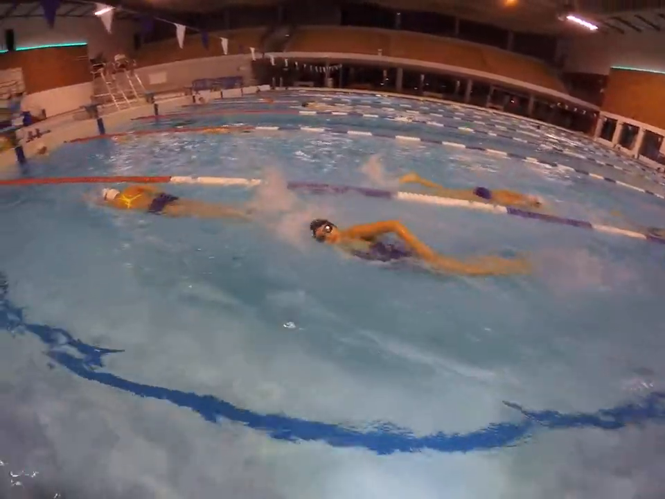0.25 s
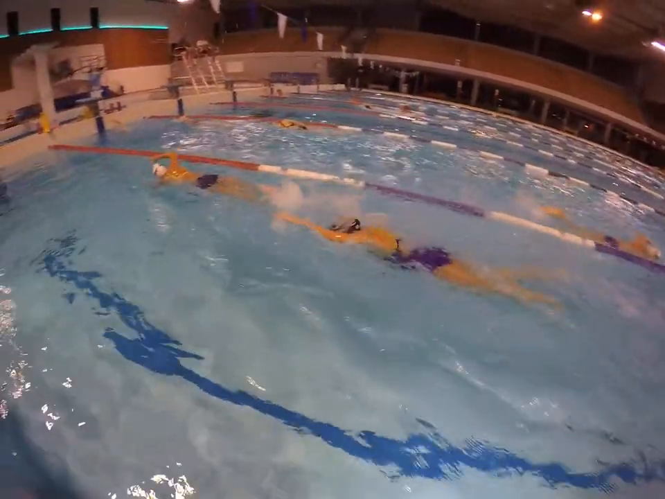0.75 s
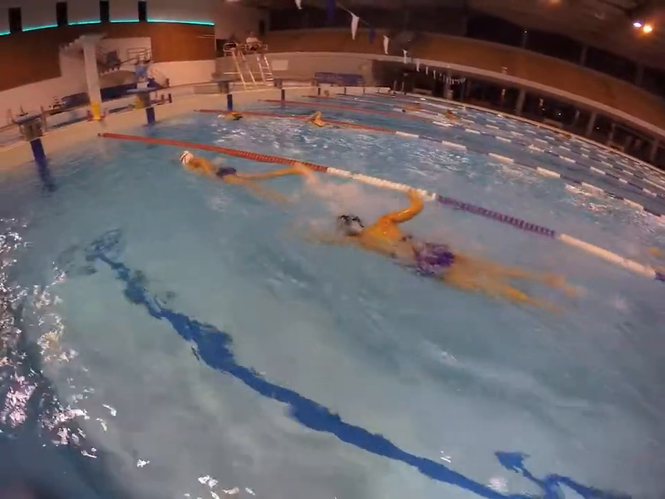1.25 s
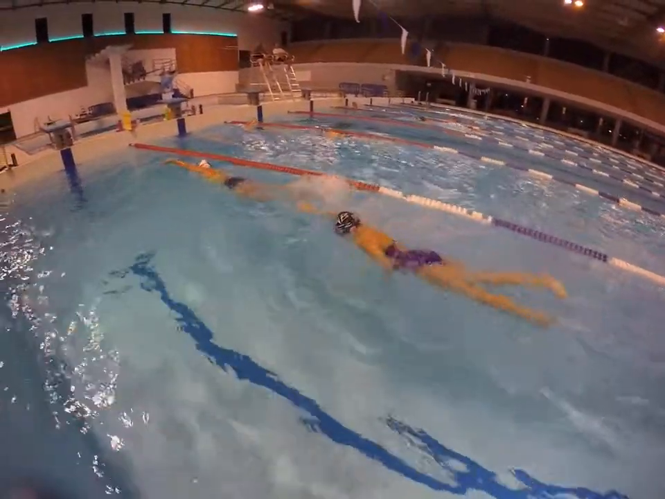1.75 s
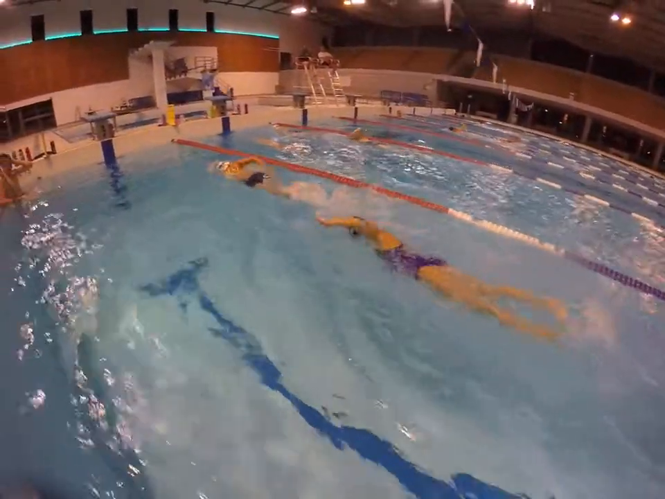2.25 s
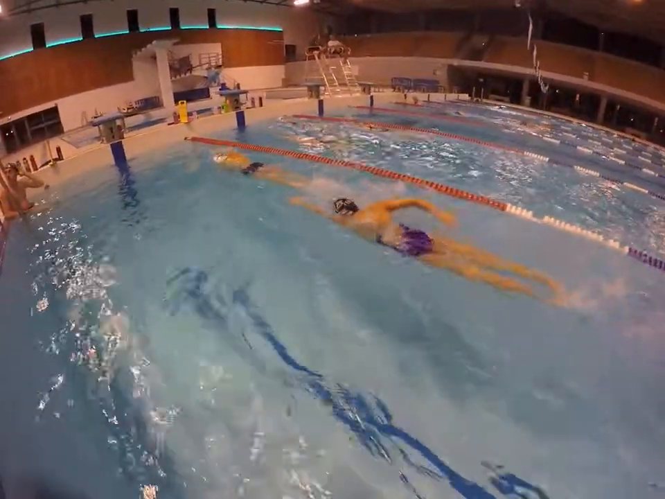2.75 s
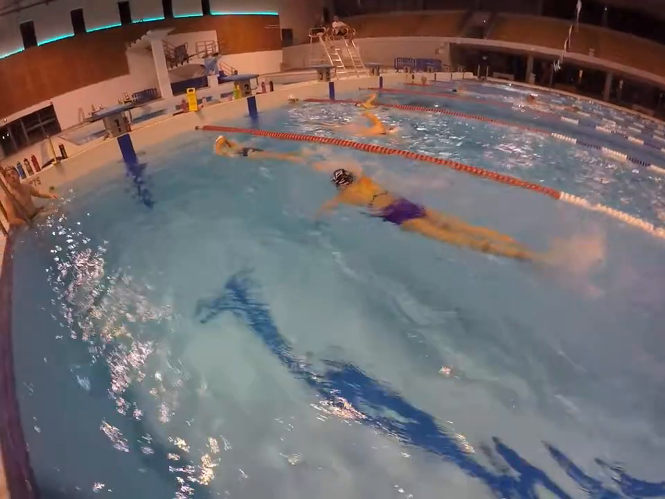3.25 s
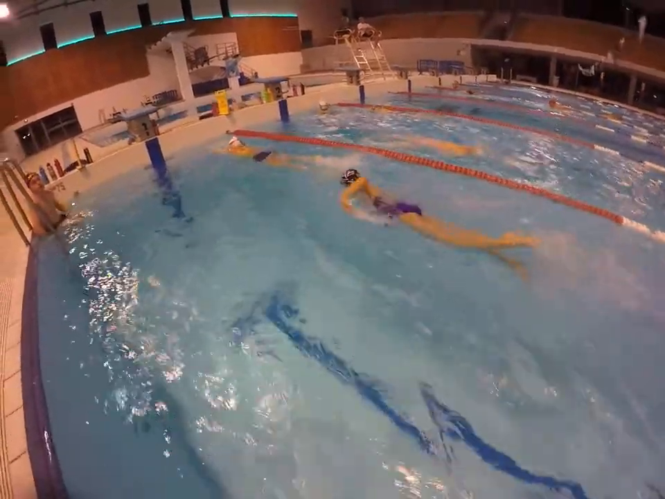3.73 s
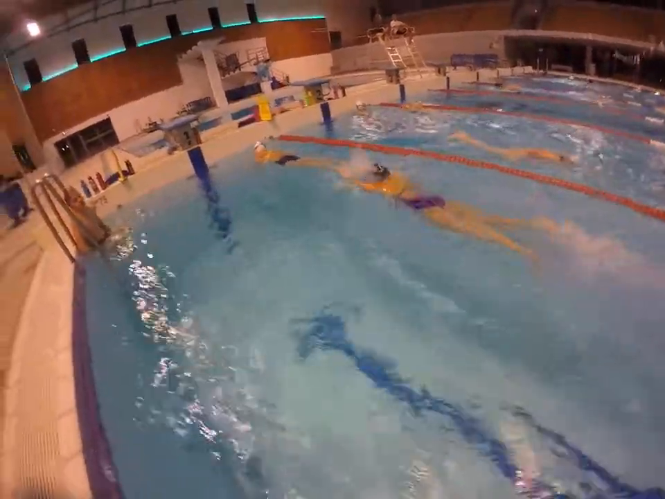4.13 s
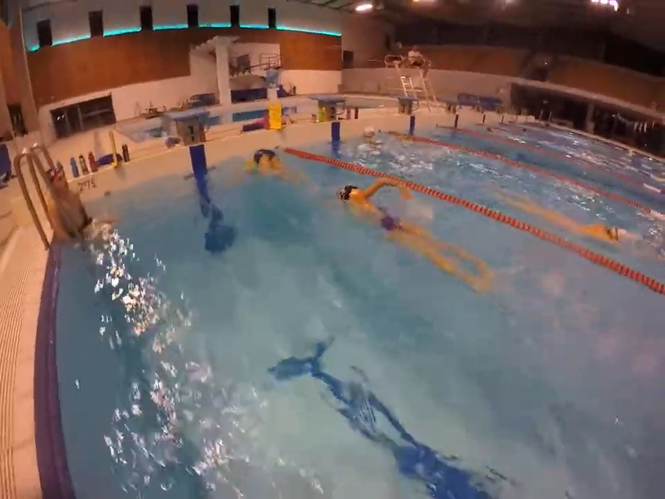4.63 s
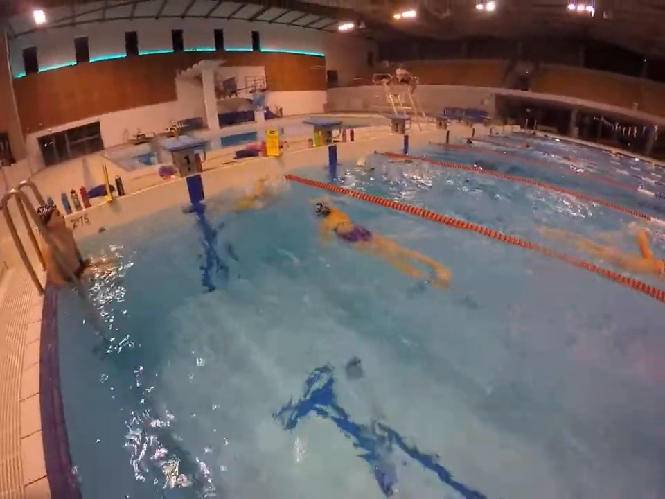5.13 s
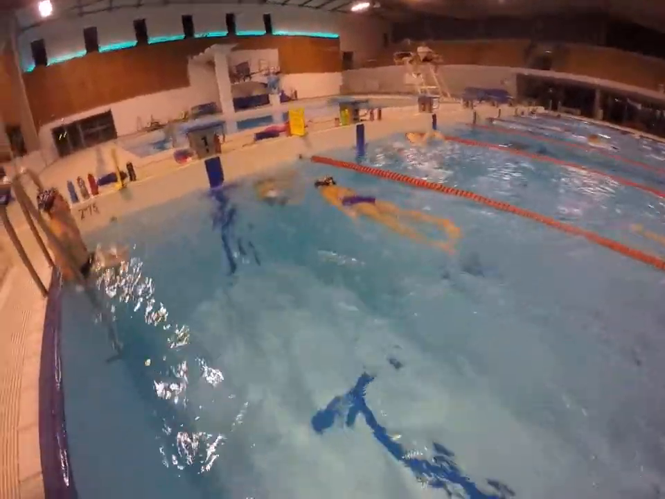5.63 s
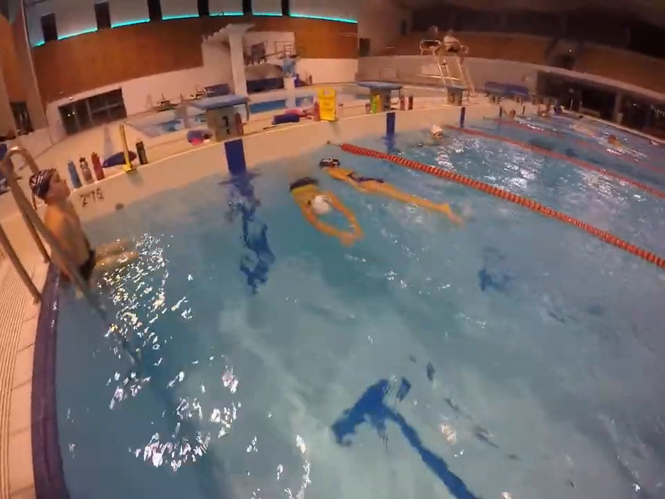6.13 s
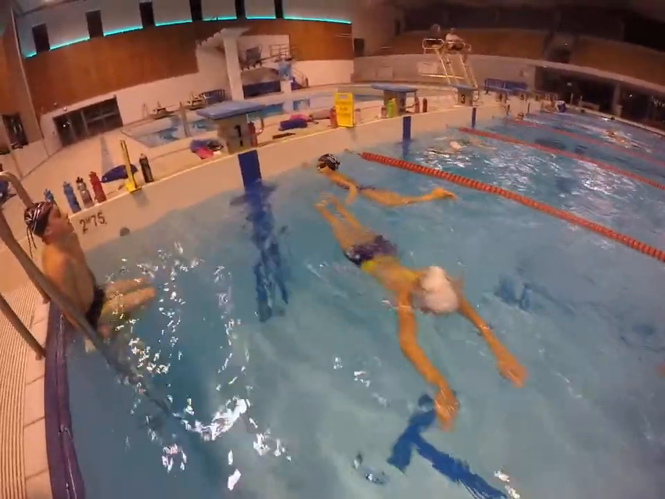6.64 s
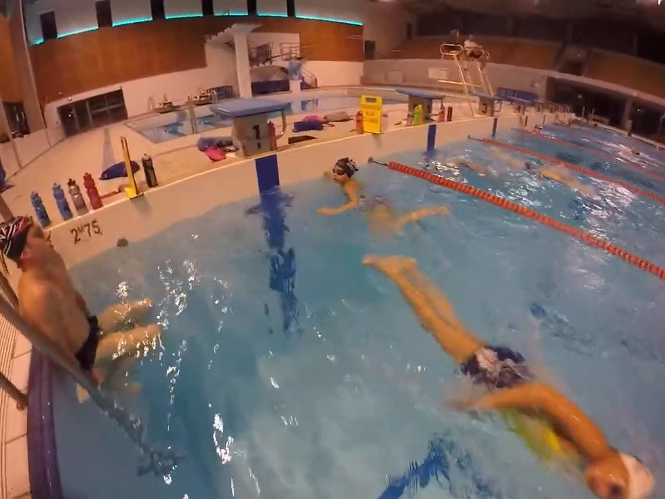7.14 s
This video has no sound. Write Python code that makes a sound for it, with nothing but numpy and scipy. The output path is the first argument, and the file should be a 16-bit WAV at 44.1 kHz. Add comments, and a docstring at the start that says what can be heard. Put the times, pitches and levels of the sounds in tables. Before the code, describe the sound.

In a reverberant indoor pool, swimmers make a continuous soft wash of crackling drops and bubbling water, slightly hollow and boxy because the microphone is inside a waterproof case held at the pool edge. From 0 to 4 seconds the wash wavers gently, with small nearer slaps and sprays, clearer around 0.7, 2.1 and 3.2, a few tiny bubble plops, and faint low hand rumble with soft bumps at the start. At about 4.1 to 4.3 seconds the grip shifts: very loud, deep thumps, short finger scrapes and two dull clacks, with a brief low wobble. At 5.1 comes a smaller bump and scrape, then from 5.3 to 5.55 more heavy thumps, scraping and two sharp, bright plastic clacks. Afterwards the quiet wash continues to about 7.4, with a little splash near 6.0, light plops near 6.5, and faint bumps.

```python
"""An indoor pool: swimmers crawl along, heard at the edge from a hand-held camera in a waterproof case.
Crackling drops and bubbles blur in the hall into an uneven wash, coloured by the air in the hollow case.
Nearer splashes, fine spray and single plopping bubbles stand out from it; all are built from noise and sines.
The hand rumbles on the case, then shifts its grip twice: dull thumps, finger scrapes, and clacks of the case,
first two dull ones, then two sharp ones."""
import sys
import numpy as np
from scipy import signal
from scipy.fft import rfft, irfft, next_fast_len
from scipy.io import wavfile
from scipy.ndimage import uniform_filter1d

SR = 44100
rng = np.random.default_rng(int(sys.argv[2]) if len(sys.argv) > 2 else 0)


def unload_wav(signal):
    """Save mono or channel-first audio to the path in sys.argv[1] as 16-bit WAV at rate SR, clipped to [-1, 1]."""
    wavfile.write(
        sys.argv[1],
        SR,
        np.round(np.clip(np.atleast_2d(signal).T, -1, 1) * 32767).astype(np.int16),
    )


N = 325442  # length in samples
T = np.arange(N) / SR  # time in seconds


# how busy the water is: time_s, wash level_db
WATER_ACTIVITY = [(0.0, -42.5), (1.17, -44.5), (4.36, -44), (4.79, -46.5), (5.08, -45.5), (5.32, -43),
                  (5.69, -46.5), (7.38, -45)]
# tone of churned water, relative: pitch_hz, level_db (per Hz)
WASH_TONE = [(150, -9.5), (250, -6.5), (350, -9), (540, -13.5), (720, -9.5), (930, -3.5), (1250, -8.5),
             (1900, -10.5), (2550, -6), (2900, -20), (4000, -16), (5700, -22.5), (6500, -28.5),
             (15000, -46)]


def wash():
    """Kicks and overflowing water: dense crackle and many bubbles, surging unevenly."""
    crackle = hall(grains(rate=5000, spread_db=4), wet_db=0.5)
    crackle = crackle * undb(1.0 * walk(22))
    gurgle = bubbles(count=2200, low_hz=685, high_hz=6270, cycles=17.0, spread_db=20)
    gurgle = hall(gurgle, wet_db=5)
    water = cavity(crackle + undb(-14) * gurgle)
    return colour(water, WASH_TONE) * undb(curve(WATER_ACTIVITY, axis=1))


# tone of droplets, relative: pitch_hz, level_db (per Hz)
SPRAY_TONE = [(1500, 4), (2300, 3.5), (3000, -8), (5000, 3.5), (6500, -3), (8800, -5.5), (10300, -8.5),
              (12000, -15), (15000, -16.5)]
# tone of a slap on the surface, relative: pitch_hz, level_db (per Hz)
SLAP_TONE = [(300, -7), (800, -12), (1300, 5), (2000, 1), (2800, -1), (3300, -2.5), (4700, -3.5),
             (6500, -16), (15000, -37)]
# nearer splashes: start_s, spray level_db, slap level_db
NEAR_SPLASHES = [(0.091, -56, -39.5), (0.338, -49, -46), (0.685, -49, -37), (1.118, -50, -44),
                 (1.512, -55, -41.5), (2.135, -44.5, -46), (2.357, -50, -45), (3.129, -53, -50),
                 (3.233, -47.5, -43), (3.523, -51, -62), (5.046, -58, -42), (5.287, -53, -39.5),
                 (5.923, -61, -46), (6.004, -47, -49), (6.43, -53, -59), (6.985, -51, -54)]
SLAP_S, SHOWER_S = 0.012, 0.031  # the slap is brief, its drops fall for longer
FAR_SPLASHES_PER_S, FAR_SPRAY_DB, FAR_SLAP_DB = 2, -60, -48


def splashes():
    """An arm or wavelet slaps the water and throws a shower of drops; farther ones come at random."""
    shower, slap = np.zeros(N), np.zeros(N)
    drops = grains(rate=5000, spread_db=3)
    sheet = grains(rate=4000, spread_db=3)
    times = np.cumsum(rng.exponential(size=40)) / FAR_SPLASHES_PER_S
    far = [(start_s, FAR_SPRAY_DB, FAR_SLAP_DB) for start_s in times[times < T[-1]]]
    for start_s, spray_db, slap_db in list(NEAR_SPLASHES) + far:
        add(shower, start_s, undb(spray_db) * swell(SHOWER_S))
        add(slap, start_s, undb(slap_db) * swell(SLAP_S))
    return shower * colour(drops, SPRAY_TONE) + slap * colour(cavity(sheet), SLAP_TONE)


def spray():
    """Fine drops patter on the surface in little showers, and foam fizzes as tiny high bubbles."""
    drops = hall(grains(rate=2500, spread_db=5.0), wet_db=-2)
    drops = drops * undb(0.43 * walk(22))
    fizz = bubbles(count=400, low_hz=5550, high_hz=15000, cycles=47, spread_db=25)
    mix = drops + undb(-13.5) * fizz
    return colour(mix, SPRAY_TONE) * undb(curve(WATER_ACTIVITY, axis=1) - 12)  # 12 dB under the wash


# single larger bubbles: start_s, starting pitch_hz, peak level_db
PLOP_EVENTS = [(.198, 870, -35), (.689, 2530, -31), (2.136, 3600, -34), (2.466, 320, -31.5),
               (3.131, 1290, -35), (5.924, 2290, -31), (6.459, 796, -36), (6.722, 1230, -39)]
PLOP_T60_S = 0.037  # time to fade by 60 dB


def plops():
    """Pockets of air close near the edge of the pool, and each rings as a short rising tone."""
    out = np.zeros(N)
    for start_s, pitch_hz, level_db in PLOP_EVENTS:
        add(out, start_s, undb(level_db) * bubble(pitch_hz, PLOP_T60_S, glide=0.045))
    return out


# bumps of the hand on the case: start_s, pitch_hz, peak level_db
HAND_BUMPS = [(0.088, 71, -17), (0.673, 71, -22), (2.959, 35.8, -30), (4.128, 53.7, -1),
              (4.227, 104.5, -0.5), (4.248, 35, -9.5), (4.272, 155, -13), (5.102, 38.7, -11.5),
              (5.369, 62, -5), (5.413, 102, -12), (5.44, 96, -9), (5.508, 92.4, -2), (5.529, 140.4, -2),
              (5.549, 60, -18), (6.07, 49, -27), (6.87, 44, -28.5)]
# the camera wobbles on its mount as the grip loosens: start_s, peak level_db
MOUNT_WOBBLES = [(4.18, -15.5), (4.324, -14), (5.28, -15)]
MOUNT_HZ, MOUNT_RISE_S, MOUNT_T60_S = 48.24, 0.0086, 0.8
THUMP_RISE_CYCLES = 0.727  # a bump builds up within one swing
THUMP_T60_S, THUMP_T60_S_PER_DB = 0.074, 0.0055  # fade of a 0 dB bump; added for each dB below that


def thumps():
    """Each bump rocks the case in the hand, which damps it; held loosely, the camera wobbles on its mount."""
    out = np.zeros(N)
    for start_s, pitch_hz, level_db in HAND_BUMPS:
        rise_s = THUMP_RISE_CYCLES / pitch_hz
        t60_s = THUMP_T60_S - THUMP_T60_S_PER_DB * level_db  # lighter bumps swing for longer
        add(out, start_s, undb(level_db) * rocking(pitch_hz, rise_s, t60_s))
    for start_s, level_db in MOUNT_WOBBLES:
        add(out, start_s, undb(level_db) * rocking(MOUNT_HZ, MOUNT_RISE_S, MOUNT_T60_S))
    # low noise that follows the strength of the swings
    shudder_tone = [(20, 2), (170, 0.0), (290, -16), (420, -18.5), (900, -58)]
    shudder = colour(rng.standard_normal(N), shudder_tone)
    strength = uniform_filter1d(np.abs(out), size=512)
    return out + undb(-18) * shudder * strength


# fingers slipping on the case:
# start_s, length_s, level_db, fade_db over the slip (negative swells), pitch_hz of the pressed wall
FINGER_SLIPS = [(4.213, 0.015, -24, 2.5, 750), (4.228, 0.022, -26.5, -1.5, 2090),
                (4.255, 0.031, -27, -4, 1250), (4.285, 0.033, -26, 6.5, 714),
                (4.322, .044, -33.5, -2.5, 2220), (5.105, .026, -23.5, 6, 1320), (5.132, .12, -33, 20, 760),
                (5.356, .012, -33.5, 2, 1650), (5.374, 0.045, -37, -4, 1510), (5.415, 0.12, -34, 13, 680),
                (5.524, 0.074, -37, 17, 430)]
# tone of the skin's ticks, relative: pitch_hz, level_db (per Hz)
SCRAPE_TONE = [(270, 2), (370, -9), (550, -17.5), (700, 3), (850, -4), (1300, -0.5), (1650, -2.5),
               (1850, -12.5), (2200, -3), (2800, -12.5), (3200, -23.5), (3700, -23), (5500, -28.5),
               (9000, -63)]
WALL_DB, WALL_Q = -1.5, 4.7  # how strongly and how purely the pressed wall rings


def scrapes():
    """Skin sticks and slips on plastic in quick irregular ticks; the wall under the finger rings along."""
    ticks = grains(rate=2500, spread_db=1.5) * undb(1.0 * walk(110))
    ticks = colour(ticks, SCRAPE_TONE)
    out = np.zeros(N)
    for start_s, length_s, level_db, fade_db, pitch_hz in FINGER_SLIPS:
        t = T[:int((length_s + 0.02) * SR)]
        pressure = undb(-fade_db * t / length_s) * (t < length_s)
        pressure = uniform_filter1d(pressure, size=160, mode="constant")  # soft start and end
        slip = pressure * ticks[int(start_s * SR):][:len(t)]
        wall = signal.lfilter(*signal.iirpeak(pitch_hz, WALL_Q, fs=SR), slip)
        add(out, start_s, undb(level_db) * (slip + undb(WALL_DB) * wall))
    return out


# the case clacks in its mount: start_s, peak level_db, corner_hz (a harder contact reaches higher)
CLACK_EVENTS = [(4.2173, -14, 1020), (4.268, -16, 900), (5.505, -4, 5600), (5.5254, -11, 4840)]
# ringing tones of the case, before a slight detuning: pitch_hz, relative level_db, t60_s (60 dB fade)
CASE_TONES = [(264.5, -11.5, 0.22), (450, -14.5, 0.065), (630, -4.5, 0.02), (711, -3.5, 0.041),
              (1264, -0.5, 0.013), (1330, -5.5, 0.018), (1600, -7, 0.015), (2130, -8.5, 0.018),
              (2440, -5.5, 0.011), (2980, -12.5, 0.01), (3716, -2.5, 0.01), (4130, -2, 0.006),
              (5100, -3, 0.0052), (5590, -2, 0.006), (7332, -29, 0.0063)]


def clacks():
    """Hard contacts ring the case's own tones; softer contacts weaken the upper ones."""
    out, t = np.zeros(N), T[:SR // 4]
    for start_s, level_db, corner_hz in CLACK_EVENTS:
        detune = 1 + 0.01 * rng.standard_normal(len(CASE_TONES))  # about 1 % either way
        ring = np.zeros(len(t))
        for k, (pitch_hz, tone_db, t60_s) in enumerate(CASE_TONES):
            strength = (-1) ** k * undb(tone_db) / (1 + (pitch_hz / corner_hz) ** 2)
            ring += strength * fade(t, t60_s) * np.sin(2 * np.pi * pitch_hz * detune[k] * t)
        lowpass = signal.butter(4, corner_hz, fs=SR, output="sos")
        crack = signal.sosfilt(lowpass, rng.standard_normal(len(t))) * fade(t, 0.011)
        sound = ring + undb(-12.5) * crack
        add(out, start_s, undb(level_db) * sound / np.abs(sound).max())
    return out


# tone of the hand's rumble, relative: pitch_hz, level_db (per Hz)
RUMBLE_TONE = [(15, -4), (28, -0.5), (45, -0.5), (70, -3), (110, -9), (160, -11.5), (240, -18.5),
               (400, -35.5), (800, -61.5)]
RUMBLE_DB, RESTLESS_DB, RESTLESS_S = -37, 2.5, 0.24  # hand at rest; extra level and time spread at a bump


def rumble():
    """Small movements of the hand reach the microphone through the case, more so around each bump."""
    tremor_db = 1.7 * walk(14)
    near_bumps = [np.exp(-((T - start_s) / RESTLESS_S) ** 2) for start_s, _, _ in HAND_BUMPS]
    restless = np.max(near_bumps, axis=0)
    noise = colour(rng.standard_normal(N), RUMBLE_TONE)
    return noise * undb(RUMBLE_DB + RESTLESS_DB * restless + tremor_db)


# air tones inside the case: pitch_hz, width_hz, added level_db
CASE_AIR = [(2266, 145, 2), (3510, 320, 4), (4710, 123, 6), (5640, 210, 1)]


def cavity(x):
    """Sound from outside makes the air in the case resonate."""
    out = x
    for pitch_hz, width_hz, level_db in CASE_AIR:
        peak = signal.iirpeak(pitch_hz, pitch_hz / width_hz, fs=SR)
        out = out + undb(level_db) * signal.lfilter(*peak, x)
    return out


HALL_T60_S = 2  # time for the echo to fade by 60 dB


def hall(x, wet_db):
    """Direct sound plus one second of the tiled hall's diffuse tail, which builds up softly; rms 1."""
    t = T[:SR]
    tail = rng.standard_normal(SR) * fade(t, HALL_T60_S) * (1 - np.exp(-t / 0.11))
    echo = irfft(rfft(x, N) * rfft(tail, N), N)
    return unit(x + undb(wet_db) * unit(echo))


def bubble(hz, t60, glide):
    """Trapped air rings for a moment and rises in pitch as it nears the surface."""
    t = T[:int(t60 * SR)]
    return fade(t, t60) * np.sin(2 * np.pi * hz * t * (1 + glide * t / t60))


def bubbles(count, low_hz, high_hz, cycles, spread_db):
    """Many small bubbles at random moments, of very unequal loudness; rms 1."""
    out = np.zeros(N)
    for when, pitch, size in rng.random((count, 3)):
        hz = low_hz * (high_hz / low_hz) ** pitch
        add(out, when * T[-1], undb(spread_db * size ** 2) * bubble(hz, cycles / hz, glide=0.078))
    return unit(out)


def grains(rate, spread_db):
    """Random tiny impacts of very unequal size, about rate per second; rms 1."""
    chance, size, sign = rng.random(N), rng.standard_normal(N), np.sign(rng.standard_normal(N))
    hits = chance < rate / SR
    return unit(hits * sign * undb(spread_db * np.clip(size, -2.5, 2.5)))


def swell(length):
    """A quick rise, peaking after a third of length (s), and a slower fall."""
    age = T[:SR // 2] / (length / 3)
    return age * np.exp(1 - age)


def rocking(hz, rise, t60):
    """A low swing that builds up and dies away."""
    t = T[:SR]
    build = np.sin(np.pi / 2 * np.minimum(t / rise, 1)) ** 2
    return build * fade(np.maximum(t - rise, 0), t60) * np.sin(2 * np.pi * hz * t)


def undb(db):
    """Decibels to gain."""
    return 10 ** (np.asarray(db) / 20)


def unit(x):
    """Scale to rms 1."""
    return x / np.sqrt(np.mean(x ** 2) + 1e-18)


def curve(rows, axis):
    """One column of a table, joined over time by straight lines."""
    rows = np.asarray(rows)
    return np.interp(T, rows[:, 0], rows[:, axis])


def colour(x, points):
    """Filter with the given (Hz, dB) curve that only looks back in time; rms 1."""
    hz, db = np.transpose(points)
    size = next_fast_len(N) * 2
    bin_hz = np.arange(size // 2 + 1) * SR / size
    log_gain = np.log(undb(np.interp(np.log(bin_hz + 1), np.log(hz), db)))
    # folding the cepstrum gives the filter minimum phase, so nothing sounds early
    cepstrum = irfft(log_gain)
    cepstrum[1:size // 2] *= 2
    cepstrum[size // 2 + 1:] = 0
    return unit(irfft(rfft(x, size) * np.exp(rfft(cepstrum)))[:N])


def walk(rate):
    """Smooth random wandering with rms 1, taking rate steps per second."""
    size = int(SR / rate)
    steps = np.repeat(rng.standard_normal(4096)[:N // size + 1], size)
    return unit(uniform_filter1d(steps, size)[:N])


def fade(t, t60):
    """Exponential decay, down 60 dB after t60 seconds."""
    return np.exp(-np.log(1000) * t / t60)


def add(out, s, sound):
    """Mix a sound in at a time in seconds."""
    i = max(int(s * SR), 0)
    out[i:i + len(sound)] += sound[:max(N - i, 0)]


def scene():
    """The pool through the case, and the hand on it."""
    water = wash() + splashes() + spray() + plops()
    hand = thumps() + scrapes() + clacks() + rumble()
    return (water + hand)[None]


TOP_HZ = 15400


def record(dry):
    """The camera cuts the top of the treble steeply."""
    return signal.sosfilt(signal.ellip(12, 0.1, 80, TOP_HZ, fs=SR, output="sos"), dry)


dry = scene()
out = record(dry)
unload_wav(out)
```